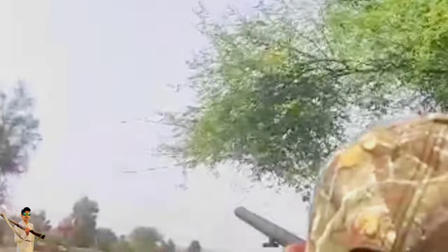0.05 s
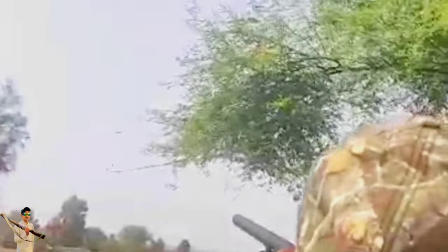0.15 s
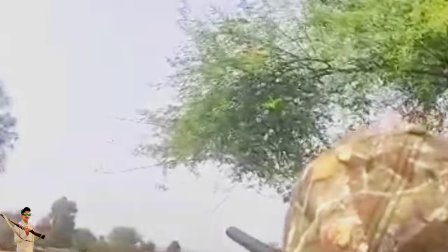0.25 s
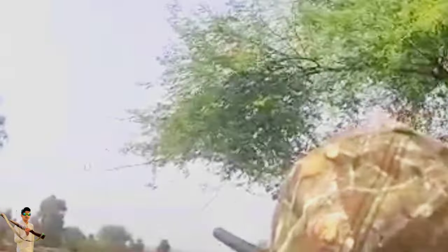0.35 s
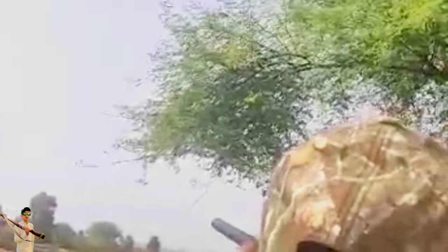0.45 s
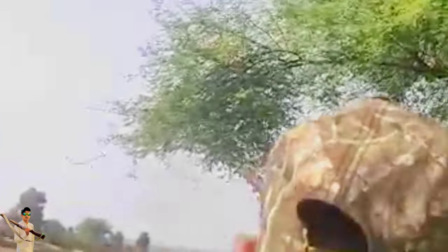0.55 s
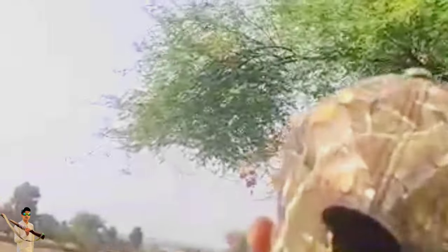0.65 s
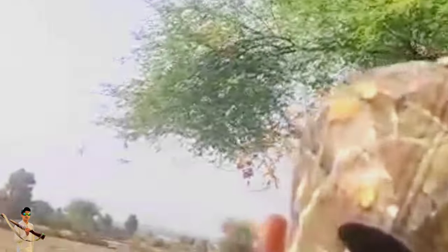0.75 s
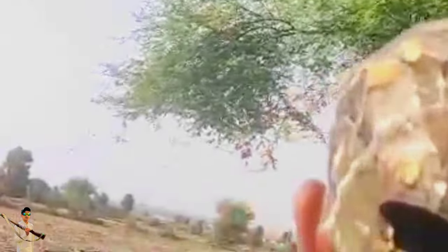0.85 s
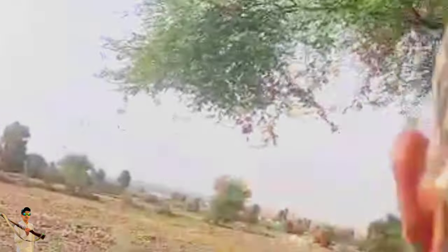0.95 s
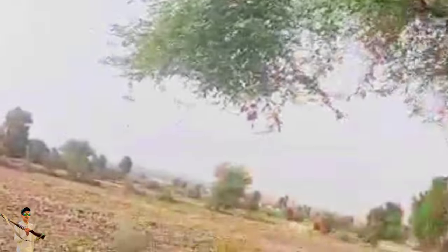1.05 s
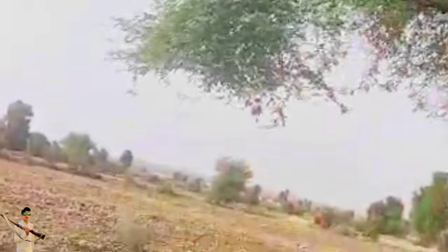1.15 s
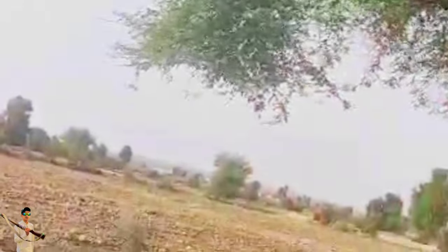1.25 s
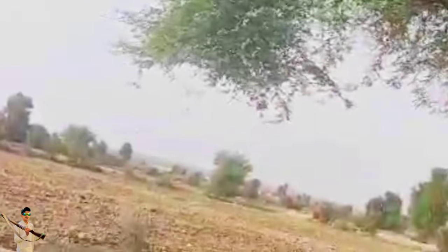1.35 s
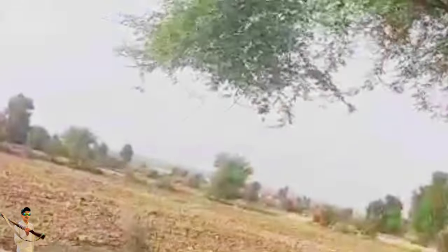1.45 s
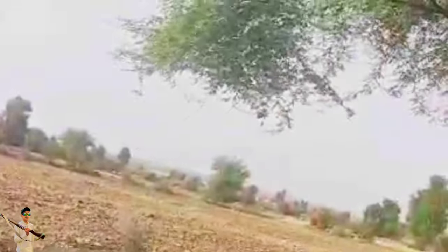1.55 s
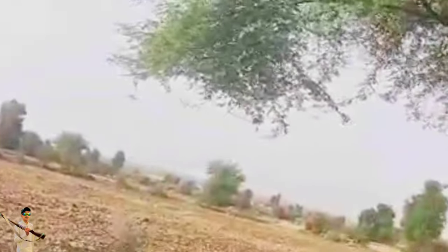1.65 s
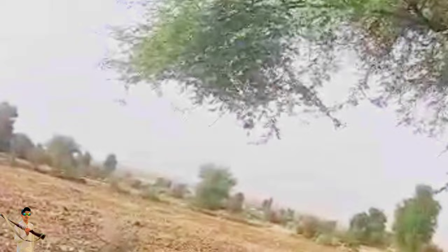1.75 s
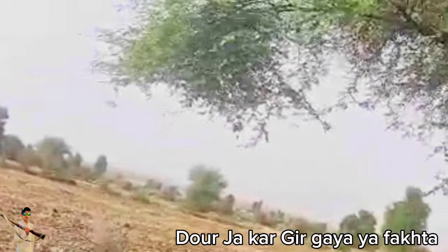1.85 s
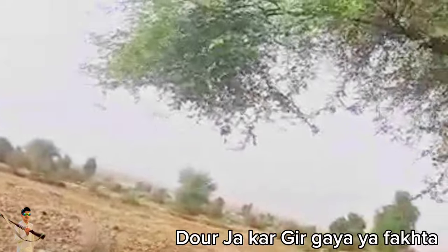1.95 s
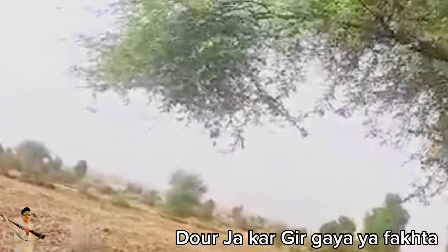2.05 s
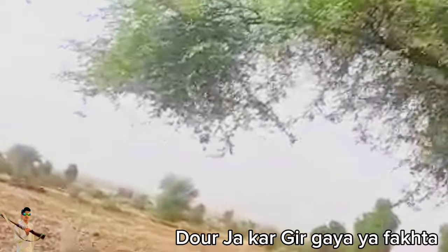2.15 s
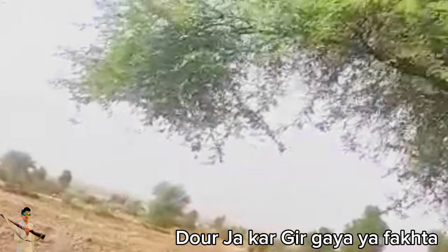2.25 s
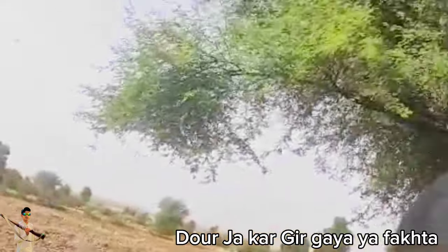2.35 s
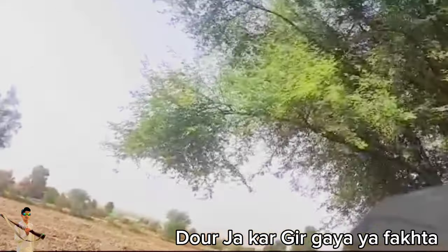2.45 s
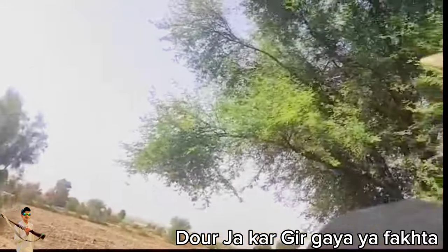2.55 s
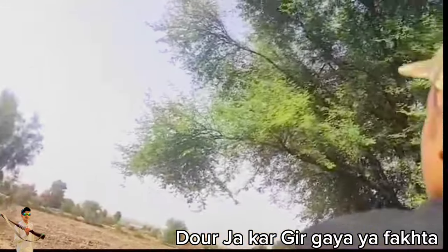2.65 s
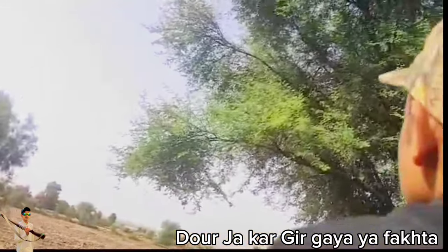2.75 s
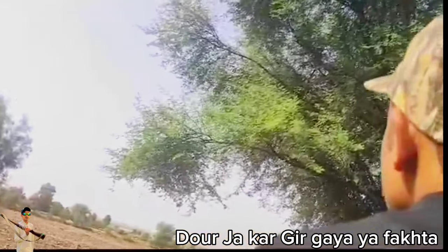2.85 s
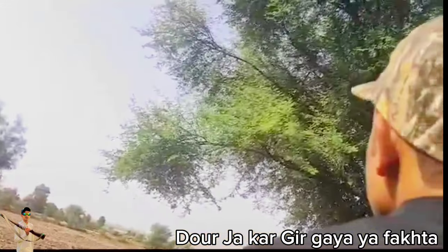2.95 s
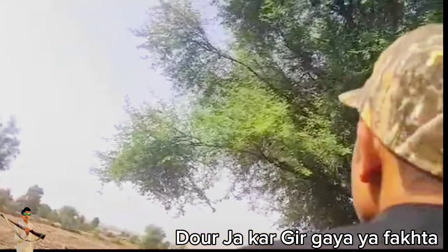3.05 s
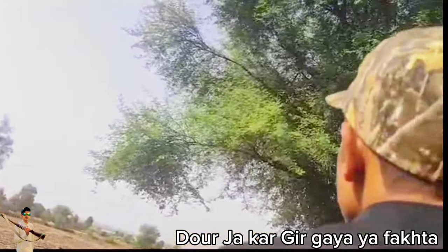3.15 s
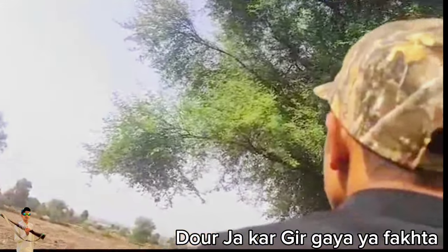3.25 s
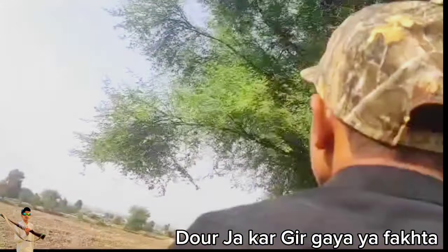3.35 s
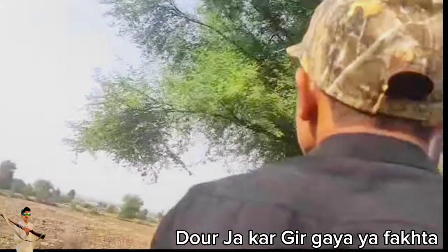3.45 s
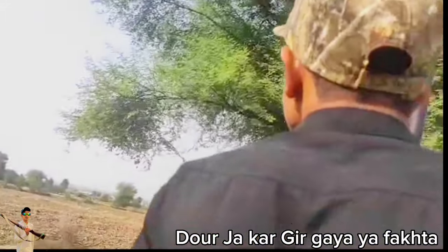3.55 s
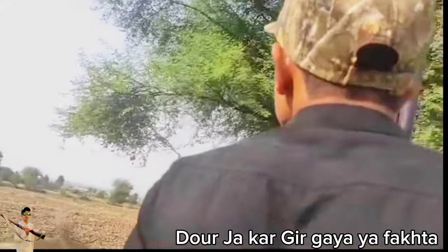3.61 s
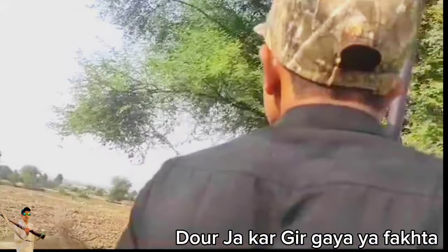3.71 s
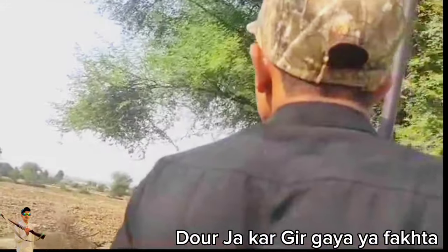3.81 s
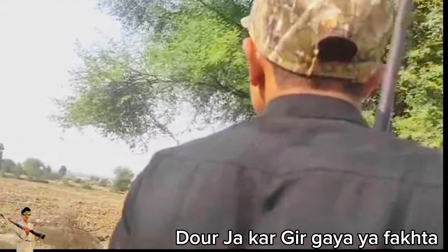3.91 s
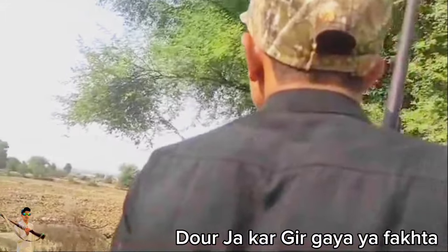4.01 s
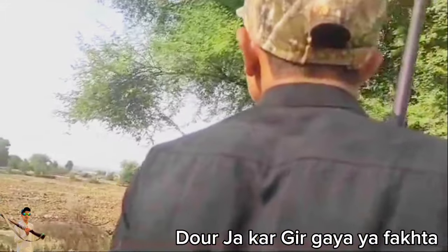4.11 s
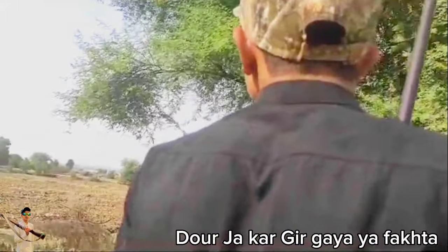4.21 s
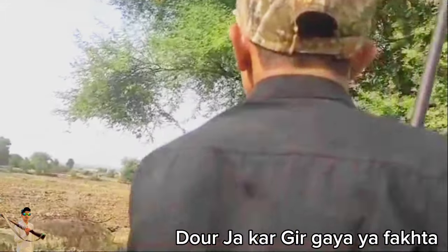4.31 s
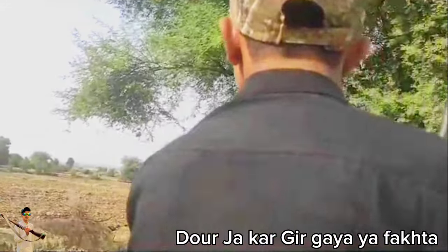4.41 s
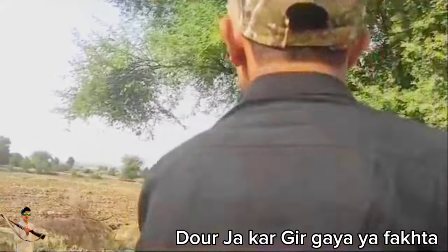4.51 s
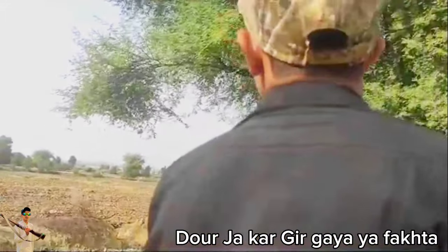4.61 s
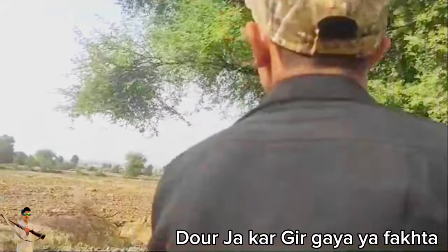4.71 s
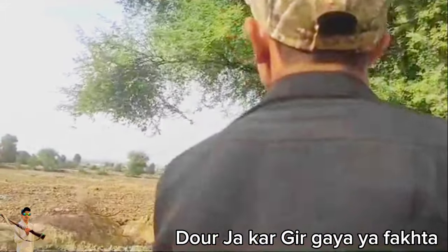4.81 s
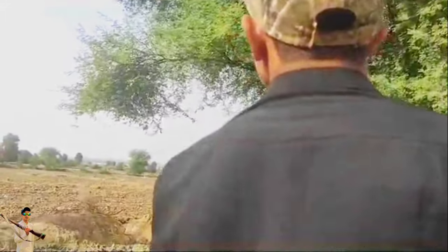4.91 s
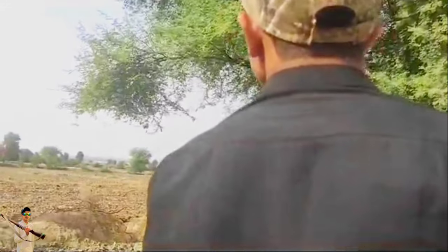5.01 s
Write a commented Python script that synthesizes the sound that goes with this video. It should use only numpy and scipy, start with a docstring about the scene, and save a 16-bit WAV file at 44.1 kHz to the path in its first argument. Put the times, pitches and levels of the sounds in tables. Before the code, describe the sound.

Quiet open country with faint air rumble, hiss and tiny bird whistles. After half a second a shotgun fires a step from the microphone, a hard, overloaded crack and dense roar. Trees and banks return ragged, hissing echoes with dull bass thuds, fading over about a second. Thin chirps follow, then a quick metallic clack of the gun. The right channel is open and loud; the left is muffled and much weaker.

```python
"""Edge of open fields, under a tree: one shotgun blast a step from two microphones, the right open, the left
muffled. Air noise and small whistling birds lie under it. The blast is a shock, a dense noise roar and barrel
modes, loud enough to overload the right side; the left catches little of it but the shock. Trunks, leaves and
far tree lines return it as sprays of small shocks; dull bass thuds sound now and then, the last two as the gun
is handled. Later the gun is handled: struck modes click and coloured noise scrapes."""
import sys
import numpy as np
from scipy import signal
from scipy.fft import rfft, irfft
from scipy.io import wavfile
from scipy.ndimage import uniform_filter1d

SR = 44100
rng = np.random.default_rng(int(sys.argv[2]) if len(sys.argv) > 2 else 0)


def log_audio(samples):
    """Write samples as a 16-bit WAV file to the path given in sys.argv[1]."""
    # one column per channel
    frames = np.atleast_2d(samples).T
    # limit to full scale, then quantise
    limited = np.clip(frames, -1, 1)
    pcm = np.round(limited * 32767).astype(np.int16)
    wavfile.write(sys.argv[1], SR, pcm)


N = 223675
T = np.arange(N) / SR  # time line, s
SHOT_S, SHOCK_LEFT_S = 0.5235, 0.5312  # the shock at the right and at the left microphone


def gain_of(db):
    """Decibels to amplitude."""
    return 10 ** (np.asarray(db) / 20)


def evened(x):
    """Scales to rms 1."""
    return x / np.sqrt(np.mean(x ** 2) + 1e-20)


def coloured(x, spectrum):
    """Gives a signal a spectrum, interpolated over log frequency, at rms 1."""
    hz, db = np.transpose(spectrum)
    bins_hz = np.fft.rfftfreq(N, 1 / SR)
    shape_db = np.interp(np.log(bins_hz + 1), np.log(hz), db)
    return evened(irfft(rfft(x) * gain_of(shape_db), N))


def noise(spectrum):
    """Steady noise of a given colour, rms 1."""
    return coloured(rng.standard_normal(N), spectrum)


def drift(rate_hz):
    """Random wandering, mostly slower than rate_hz, rms 1."""
    hz = np.fft.rfftfreq(N, 1 / SR)
    return evened(irfft(rfft(rng.standard_normal(N)) / (1 + (hz / rate_hz) ** 4), N))


def scatter(spectrum, per_s, clump_db):
    """Many small copies of the shock, arriving at random and in clumps, rms 1."""
    arrivals = rng.standard_normal(N) * (rng.random(N) < per_s / SR)
    return coloured(arrivals * gain_of(clump_db * drift(70)), spectrum)


def patchy(x, depth_db, width_hz=450, length_s=0.028):
    """Crossing paths strengthen and cancel patches of the spectrum from moment to moment; rms 1."""
    window, hop = 512, 128
    z = signal.stft(x, nperseg=window, noverlap=window - hop)[2]
    bins = max(1, round(width_hz * window / SR))
    frames = max(1, round(length_s * SR / hop))
    patches = uniform_filter1d(rng.standard_normal(z.shape), bins, axis=0)
    patches = evened(uniform_filter1d(patches, frames, axis=1))
    filtered = signal.istft(z * gain_of(depth_db * patches), nperseg=window, noverlap=window - hop)[1]
    return evened(filtered[:N])


def burst(s, rise, decay):
    """An envelope that swells at s and dies away; rise and decay are time constants in seconds."""
    age = np.maximum(T - s, 0)
    return (1 - np.exp(-age / rise)) * np.exp(-age / decay)


def ring(modes):
    """Damped sines of a struck object, one second long; neighbouring modes swing opposite ways."""
    t = T[:SR]
    sound = np.zeros(SR)
    for k, (hz, db, t60) in enumerate(modes):
        sound += (-1) ** k * gain_of(db - 60 * t / t60) * np.sin(2 * np.pi * hz * t)
    return sound


def placed(s, sound):
    """A sound set at its moment on the time line."""
    return np.pad(sound, (round(s * SR), N))[:N]


def ports(x, left_db):
    """The right microphone is open; the left is weak, and dull above 3 kHz."""
    dull = signal.lfilter(*signal.butter(3, 3000, fs=SR), x)
    return np.array([gain_of(left_db) * dull, x])


# Open country at the microphones, relative colour: pitch_hz, level_db (per Hz)
AIR_COLOUR = [(18, -59.5), (25, -32), (45, -14), (75, -4), (140, -1.5), (250, -5.5), (380, -6),
              (560, -12.5), (900, -16.5), (1350, -17.5), (2000, -24.5), (4400, -27), (6600, -29.5),
              (9300, -40.5), (15500, -30)]
AIR_DB = -64  # common to both sides, before each side's own gain


def air():
    """Soft rumble of open country and microphone hiss: wavering noise, unrelated in the two microphones."""
    left, right = [noise(AIR_COLOUR) * gain_of(0.7 * drift(4.9)) for _ in range(2)]
    return gain_of(AIR_DB) * np.array([gain_of(2.0) * left, gain_of(4) * right])


# Small birds, one slur a row, levels before flutter and blur:
# start_s, length_s, first_pitch_hz, last_pitch_hz, level_db
BIRD_SLURS = [(0.078, 0.082, 6260, 4900, -70), (.2, 0.12, 3970, 4980, -75.5),
              (.472, 0.052, 4050, 4780, -66), (2.425, 0.055, 7250, 6500, -55.5),
              (2.46, 0.037, 6980, 4570, -50.5), (3.126, .075, 6210, 4580, -69),
              (3.336, 0.0311, 5430, 5950, -61), (3.364, 0.044, 5900, 4410, -56.5),
              (4.648, .05, 4600, 5900, -70), (4.755, .1, 4600, 5020, -70)]
ARCH = 0.06  # a slur bows upward by this share of its sweep
BLUR = 0.25  # share of the power scattered by branches


def birds():
    """Thin, fluttering whistles: swept sines of unsteady pitch, a little blurred by the branches."""
    calls = np.zeros(N)
    waver = 1 + 0.015 * drift(270)
    for s, length, first_hz, last_hz, db in BIRD_SLURS:
        u = np.clip((T - s) / length, 0, 1)  # progress through the slur
        sweep = last_hz - first_hz
        arch = np.sin(np.pi * u)
        hz = first_hz + sweep * u + ARCH * abs(sweep) * arch
        phase = 2 * np.pi * np.cumsum(hz * waver) / SR
        calls += gain_of(db) * np.sqrt(abs(arch)) * np.sin(phase)
    branches = rng.standard_normal(SR // 2) * np.exp(-T[:SR // 2] / 0.05)
    blurred = signal.fftconvolve(calls, branches / np.linalg.norm(branches))[:N]
    direct = calls * gain_of(2.5 * drift(110))
    return ports(np.sqrt(1 - BLUR) * direct + np.sqrt(BLUR) * blurred, left_db=-9.5)


def shock(s, push_s, edge_hz):
    """A jump in pressure followed by suction; the microphone rounds the jump and loses the deep bass."""
    u = np.maximum(T - s, 0) / push_s
    wave = (T >= s) * (1 - u) * np.exp(-u)
    rounded = signal.lfilter(*signal.butter(2, edge_hz, fs=SR), wave)
    return signal.lfilter(*signal.butter(2, 280, "highpass", fs=SR), rounded)


# Close roar a step from the right microphone, relative colour: pitch_hz, level_db (per Hz)
ROAR_COLOUR = [(25, -31), (55, -25), (90, -13.5), (155, 0), (230, -4), (330, 0.5), (460, -2), (580, -7.5),
               (720, -4), (1050, -6.5), (1500, -5.5), (3100, -12), (4300, -8), (5600, -14), (6750, -6.5),
               (9300, -21), (13300, -19.5), (15500, -22.5)]
# Barrel ringing after the shot: pitch_hz, level_db, t60_s (time to fall 60 dB)
BARREL_MODES = [(4440, -32, 1), (6320, -27, .35), (6535, -34, 0.94), (6480, -30, 0.93), (6600, -27.5, 0.95),
                (7251, -36, 0.99)]


def blast():
    """The shock, then a dense roar from ground, shooter and the tree overhead, which holds and collapses."""
    hold_s, fall_s = 0.062, 0.02
    past_hold = 2 * (T - SHOT_S - hold_s) / fall_s
    collapse = 1 / np.sqrt(1 + np.exp(np.minimum(past_hold, 80)))  # the limit avoids overflow
    level = burst(SHOT_S, 0.0028, 0.6) * collapse
    roar = gain_of(-7.5) * level * scatter(ROAR_COLOUR, per_s=20000, clump_db=1.67)
    right_shock = gain_of(-2) * shock(SHOT_S, push_s=0.0006, edge_hz=9800)
    right = roar + right_shock + placed(SHOT_S, ring(BARREL_MODES))
    # the muffled side: a strong shock, a two-stage decay, and a soft swell that sets in just ahead
    decay = gain_of(-19.5) * burst(SHOCK_LEFT_S, 0.0004, 0.0072)
    decay += gain_of(-33.5) * burst(SHOCK_LEFT_S, 0.002, 0.035)
    early_swell = gain_of(-33) * burst(0.52, 0.003, 0.022)
    muffled = noise([(40, -26), (200, -0.5), (800, -1.0), (1300, -10.5), (2200, -11),
                     (4500, -20.5), (6500, -38.5), (9000, -44), (15000, -40)])
    left_shock = gain_of(6.5) * shock(SHOCK_LEFT_S, push_s=0.0005, edge_hz=2100)
    left = left_shock + (decay + early_swell) * muffled
    return np.array([left, right])


# Sharp echoes from banks and trunks, levels relative: peak_s, level_db, treble_db (relative to level_db)
ECHOES = [(0.575, -17, -25), (0.63, -24, 0), (.731, -26.5, -0.5), (.74, -21, -1), (0.783, -24.5, -2.5),
          (0.813, -38.5, 2), (.901, -40.5, 3), (1.01, -42, -10), (1.058, -38, -22), (1.115, -38.5, -8),
          (1.229, -38.5, -7.5), (1.284, -34, -14.5), (1.328, -43.5, -10), (1.486, -45.5, -25),
          (1.504, -38.5, -29), (1.58, -46.5, -12), (1.681, -49.5, -23), (1.746, -62, -1)]
# Dull thuds that hold only bass: centre_s, envelope_peak_db, pitch_hz
THUDS = [(0.767, -21.5, 235), (1.108, -38.5, 164), (1.455, -45.5, 101), (1.525, -47, 88),
         (2.096, -51, 108.3), (2.335, -50, 90), (2.665, -47.5, 99.6)]
# Leaf hiss, in the echoes and in the roll, relative colour: pitch_hz, level_db (per Hz)
LEAF_COLOUR = [(300, -26.5), (1200, -6.5), (2200, -2), (3000, -2), (4500, 1.5), (5700, -2), (6750, 2),
               (7600, -3), (8600, -13), (10000, -32.5)]
SPREAD_S, SPREAD_PER_S = 0.0046, 0.002  # an echo is longer the later it comes


def echoes():
    """Banks and trunks return short sprays of shocks, more smeared with distance; thuds are brief bass cycles."""
    body, treble = np.zeros((2, N))
    for s, db, treble_db in ECHOES:
        spread = SPREAD_S + SPREAD_PER_S * (s - SHOT_S)
        swell = gain_of(db) * (T > SHOT_S) / (1 + ((T - s) / spread) ** 2) ** 1.9
        body += swell
        treble += gain_of(treble_db) * swell
    colour = [(100, -25.5), (330, -0.5), (750, -2.0), (1000, 0), (1350, 2),
              (1900, -7), (2600, -13), (6000, -29.5), (10000, -55)]
    trunks = patchy(scatter(colour, per_s=7400, clump_db=1.5), depth_db=4.5)
    sprays = body * trunks + treble * scatter(LEAF_COLOUR, per_s=6800, clump_db=-1)
    thuds = np.zeros(N)
    for s, db, hz in THUDS:
        envelope = gain_of(db) * np.exp(-((T - s) * hz / 0.82) ** 2)
        thuds += envelope * np.sin(2 * np.pi * hz * (T - s))
    return ports(gain_of(4) * sprays + thuds, left_db=-32.0)


FRONT_BLUR, BACK_BLUR = 0.047, 0.15  # the edges of a stand smear by these shares of the delay
DEPTH_LOSS_DB_PER_S = 25.5  # trees at the back of a stand are screened


def stand(front_s, back_s):
    """The return from one stand of trees swells at the front edge, sags, and dies away behind the back edge."""
    swell = 0.5 + 0.5 * np.tanh((T - front_s) / (FRONT_BLUR * (front_s - SHOT_S)))
    sag = gain_of(-DEPTH_LOSS_DB_PER_S * (np.clip(T, front_s, back_s) - front_s))
    return swell * sag * np.exp(-np.maximum(T - back_s, 0) / (BACK_BLUR * (back_s - SHOT_S)))


# Stands of trees out across the fields, levels before the losses below:
# front_edge_s, back_edge_s, leaf_hiss_db, top_octave_db, body_db
STANDS = [(0.608, 0.694, -25.5, -33, -28), (0.708, 0.791, -23, -33.5, -36),
          (0.973, 1.087, -39.5, -63.5, -42.5), (1.368, 1.569, -43.5, -52.5, -46.5)]
# Colours of the return, relative: pitch_hz, level_db (per Hz)
LEAF_TIP_COLOUR = [(6000, -29), (8500, 6), (10000, 1), (11300, -4), (12300, 1.5), (15500, -3.5)]
BODY_COLOUR = [(80, -26.5), (200, -9), (350, -3), (520, -5.5), (680, 2), (1000, -1.5), (1300, 3),
               (1800, -0.5), (2400, -6), (5000, -13.5), (9000, -35)]
BOOM_COLOUR = [(25, -18), (55, -11.5), (90, 2), (200, -4), (300, -4), (700, -35.5)]
FIELD_DB, FIELD_FADE_DB_PER_S = -40, 17  # open ground returns a steadily fading wash
FIELD_HISS_DB, FIELD_TOP_DB = 1, -16.5  # treble of that wash before air loss, relative to its body
LEAF_LOSS_DB_PER_S = 5.5  # the air takes the treble on the way
TOP_LOSS_DB_PER_S = 26.5  # a further loss in the top octave of a stand
BOOM_DB, BOOM_FADE_DB_PER_S = -28.5, 67.5
BOOM_FROM_TREES_DB = -14  # bass that the stands return, relative to their body


def roll():
    """Leaves scatter the treble back, trunks and rough ground the body and the boom."""
    delay = np.maximum(T - SHOT_S, 0)
    leaves, top, trunks = np.zeros((3, N))
    for front_s, back_s, hiss_db, top_db, body_db in STANDS:
        swell = stand(front_s, back_s)
        top_loss_db = TOP_LOSS_DB_PER_S * np.maximum(T - front_s, 0)
        leaves += gain_of(hiss_db) * swell
        top += gain_of(top_db - top_loss_db) * swell
        trunks += gain_of(body_db) * swell
    window = np.interp(T, [0.58, 0.62], [0, 1])
    field = window * gain_of(FIELD_DB - FIELD_FADE_DB_PER_S * delay)
    ground = window * gain_of(BOOM_DB - BOOM_FADE_DB_PER_S * delay)
    air_loss = gain_of(-LEAF_LOSS_DB_PER_S * delay)
    # unrelated returns add as powers, hence hypot
    hiss_level = air_loss * np.hypot(leaves, gain_of(FIELD_HISS_DB) * field)
    hiss = hiss_level * patchy(scatter(LEAF_COLOUR, per_s=15000, clump_db=1.1), depth_db=2.5)
    tips_level = air_loss * np.hypot(top, gain_of(FIELD_TOP_DB) * field)
    tips = tips_level * scatter(LEAF_TIP_COLOUR, per_s=14000, clump_db=0.5)
    flutter = gain_of(0.8 * drift(22))  # countless lesser echoes make the body uneven
    body_level = np.hypot(trunks, field) * flutter
    body = body_level * patchy(scatter(BODY_COLOUR, per_s=3000, clump_db=1.86), depth_db=2.0)
    boom = np.hypot(ground, gain_of(BOOM_FROM_TREES_DB) * trunks) * noise(BOOM_COLOUR)
    return ports(hiss + tips + body + boom, left_db=-36.5)


# Modes of the stock and action, levels relative: pitch_hz, level_db, t60_s (time to fall 60 dB)
ACTION_MODES = [(330, -8, 0.11), (416, 0.5, 0.042), (533, -8, 0.038), (757, -3.5, 0.018),
                (934, -1.5, 0.014), (1108, -5, 0.038), (1300, -9.5, 0.013), (1650, -12, 0.035),
                (2340, -8.5, 0.025), (3700, -4, 0.0066), (4060, -6.5, 0.02), (4960, -0.5, 0.011),
                (5640, 0, 0.0048), (6460, 2.5, 0.0075), (7800, -14, 0.016)]


def knock(contact_hz, octaves):
    """A blow wakes the modes of the gun near the pitch of its contact; peak 1."""
    woken = []
    for hz, db, t60 in ACTION_MODES:
        distance = np.log2(hz / contact_hz) / octaves
        woken.append((hz, db - 4 * distance ** 2, t60))
    sound = ring(woken)
    return sound / abs(sound).max()


# Knocks as the gun is handled, levels before the bass cut:
# start_s, level_db, contact_pitch_hz, scrape_db, scrape_decay_s
CLICKS = [(2.328, -50, 4014, -54, .0035), (2.664, -54, 4030, -57, 0.0033),
          (4.288, -48.5, 2000, -51.5, 0.0042), (4.304, -49, 2390, -51, .003),
          (4.4572, -35.5, 1080, -42.5, 0.0044), (4.486, -29.5, 680, -46, 0.0026),
          (4.4906, -36.5, 1480, -47.5, 0.0061), (4.504, -43, 5500, -49, .0035),
          (4.5082, -42.5, 700, -51, .0026), (4.5118, -27, 4500, -42, 0.0014),
          (4.525, -42, 430, -49, 0.0048), (4.6, -61, 5000, -62, 0.0016)]
# Scraping steel, relative colour: pitch_hz, level_db (per Hz)
SCRAPE_COLOUR = [(500, 9.5), (2200, 0), (3600, 1.5), (5000, -2.5), (7000, 1.5), (8500, -6.5), (11000, -15),
                 (15000, -8)]
SCRAPE_RISE_S = 0.00044  # each knock starts a short scrape
SLIDE_S, SLIDE_END_S, SLIDE_DB = 4.463, 4.52, -47.5  # steel slides between the knocks


def handling():
    """Steel parts scrape as coloured noise and knock, and the gun rings briefly."""
    knocks, scrapes = np.zeros((2, N))
    for s, db, contact_hz, scrape_db, decay in CLICKS:
        knocks += gain_of(db) * placed(s, knock(contact_hz, octaves=0.61))
        scrapes += gain_of(scrape_db) * burst(s, SCRAPE_RISE_S, decay)
    slide = gain_of(SLIDE_DB) * (T > SLIDE_S) * np.exp(-np.maximum(T - SLIDE_END_S, 0) / 0.017)
    sound = knocks + (scrapes + slide) * noise(SCRAPE_COLOUR)
    return ports(signal.lfilter(*signal.butter(2, 200, "highpass", fs=SR), sound), left_db=-31)


def scene():
    """All sources at the two microphones."""
    return air() + birds() + blast() + echoes() + roll() + handling()


def record(dry):
    """The input overloads softly towards a ceiling; then a low-pass sets the band limit."""
    ceiling, edge_hz = 0.85, 15650
    squashed = ceiling * np.tanh(dry / ceiling)
    lowpass = signal.firwin(511, edge_hz, window=("kaiser", 9), fs=SR)
    return signal.oaconvolve(squashed, lowpass[None], "same", axes=1)


dry = scene()
out = record(dry)
log_audio(out)
```